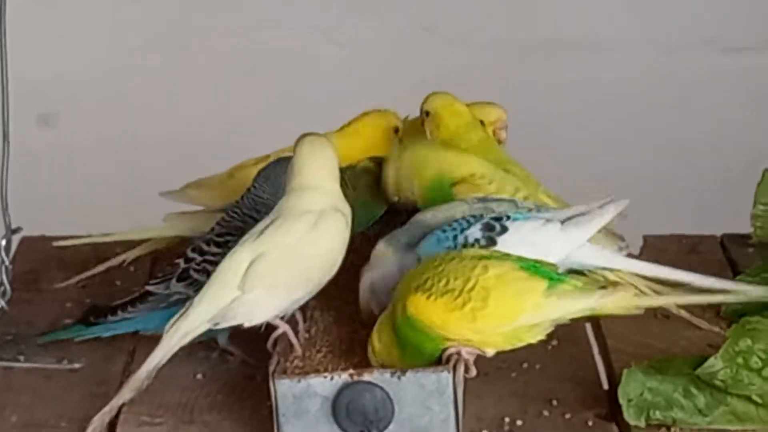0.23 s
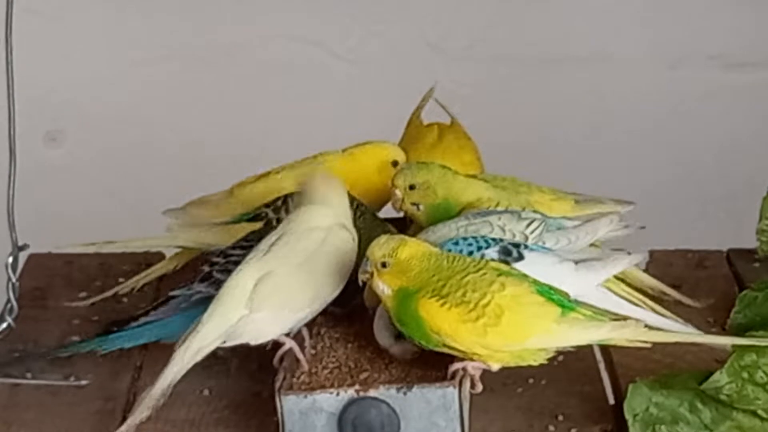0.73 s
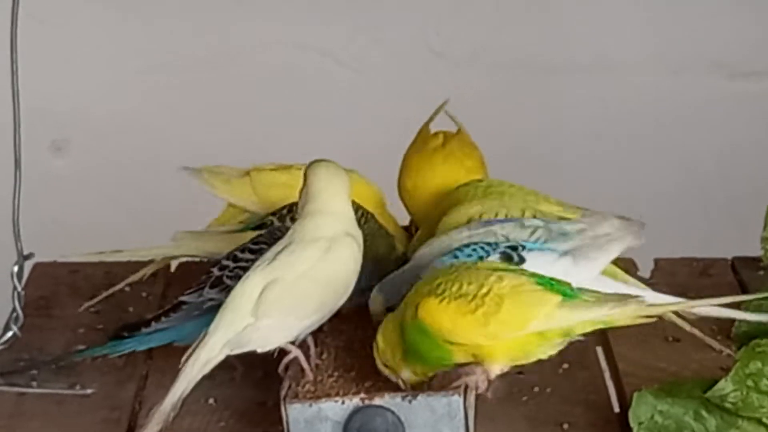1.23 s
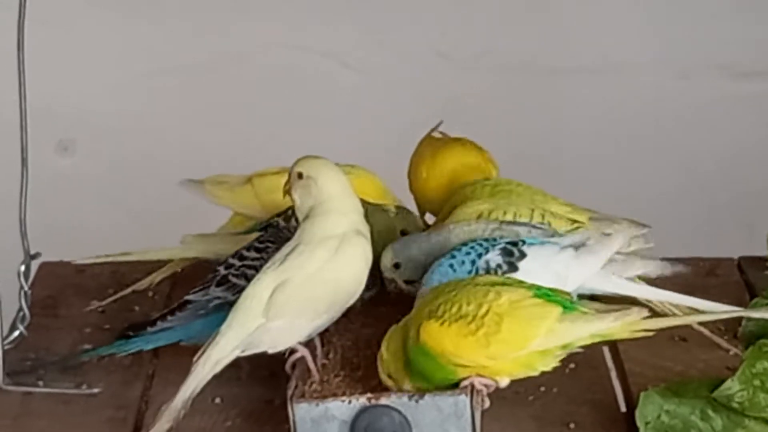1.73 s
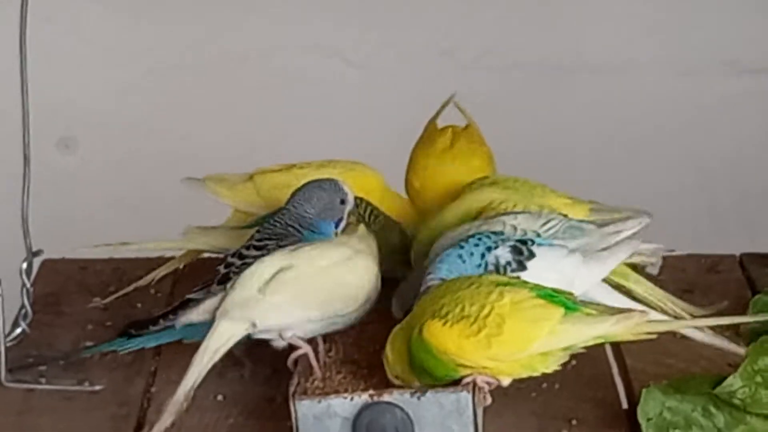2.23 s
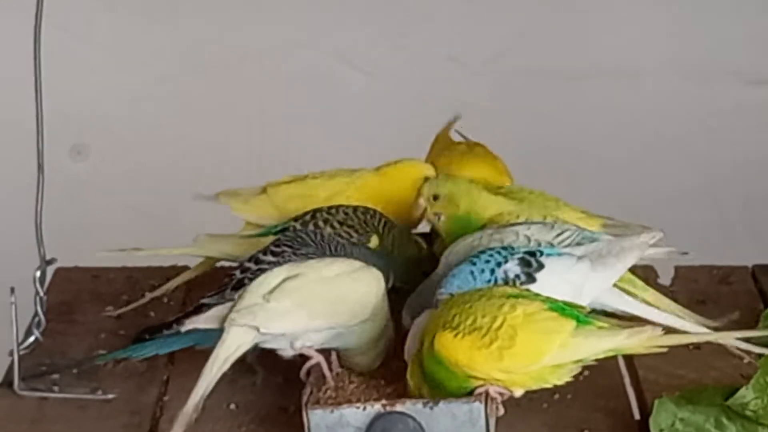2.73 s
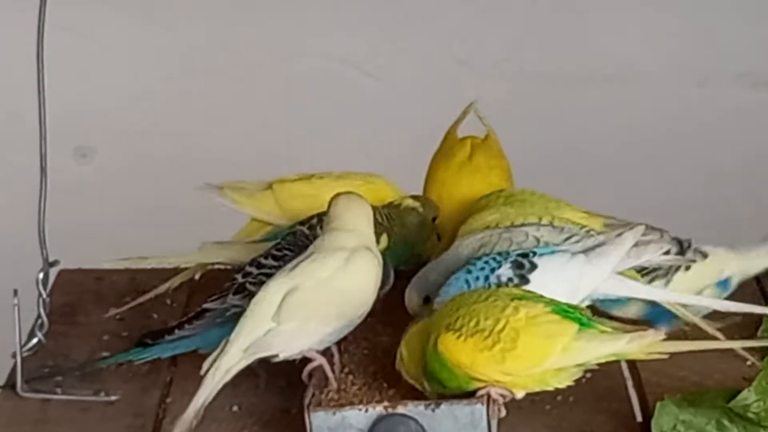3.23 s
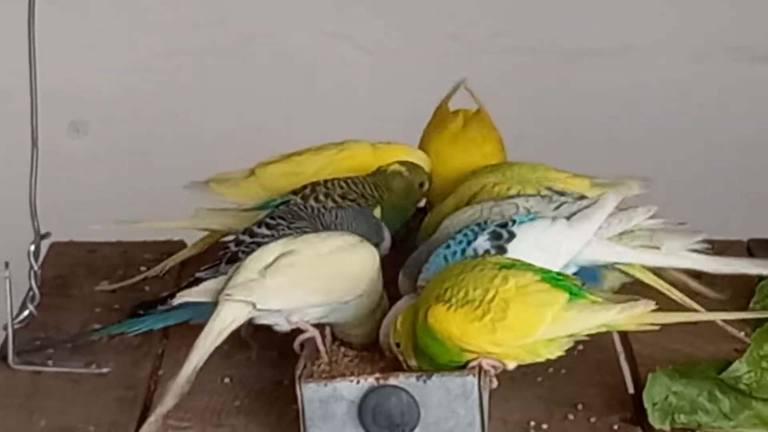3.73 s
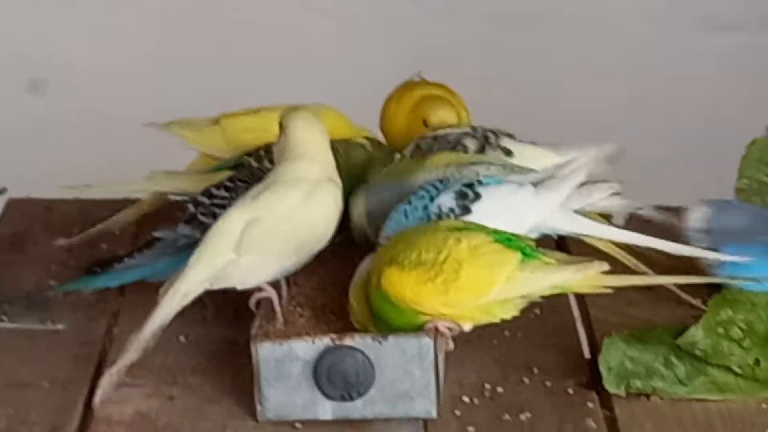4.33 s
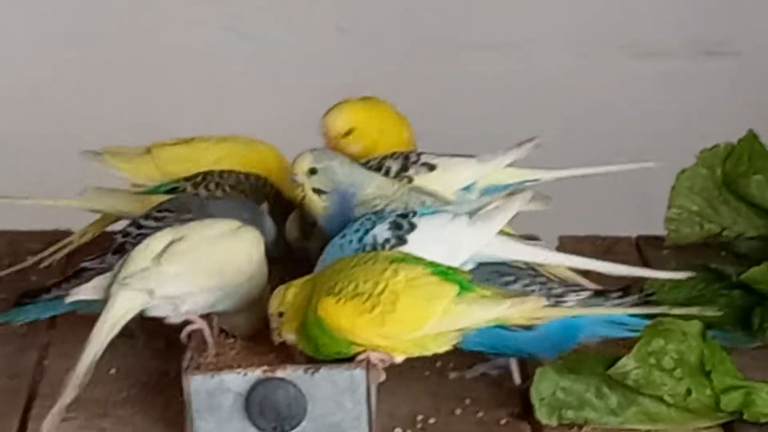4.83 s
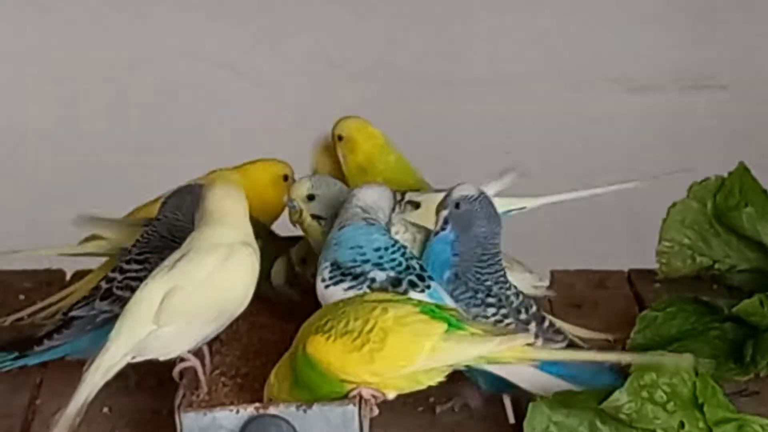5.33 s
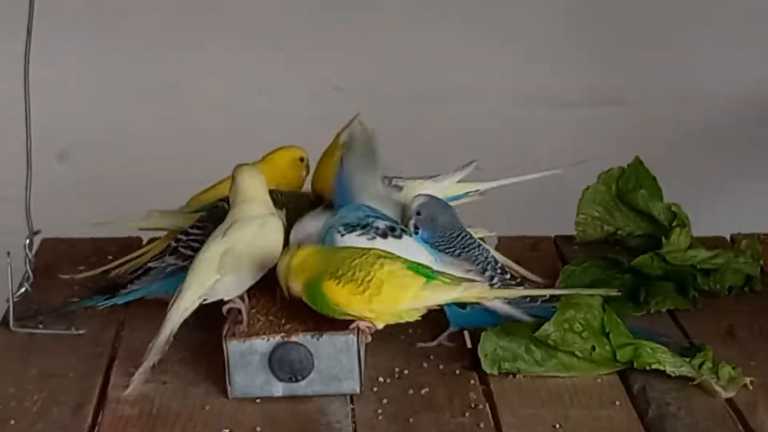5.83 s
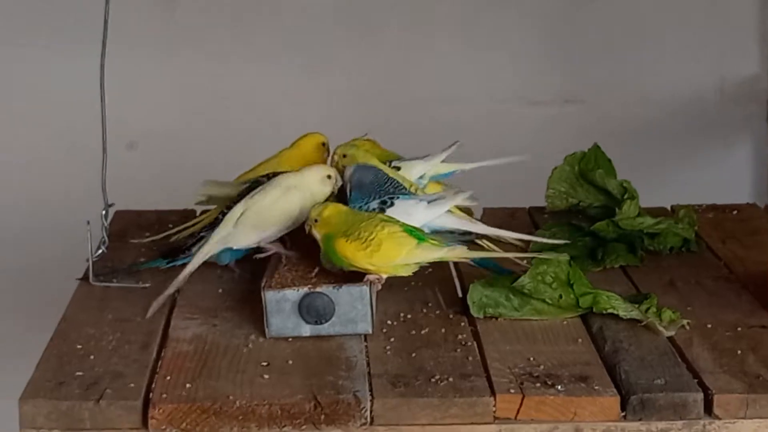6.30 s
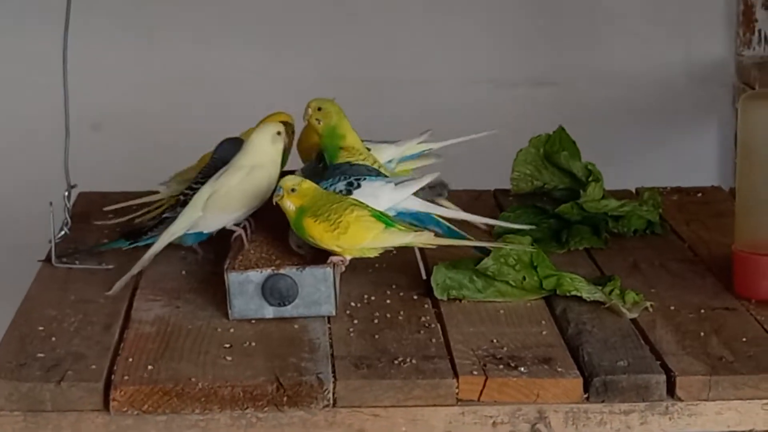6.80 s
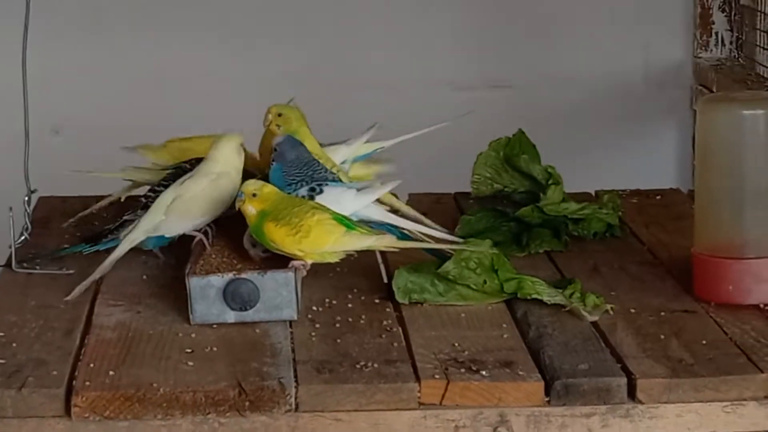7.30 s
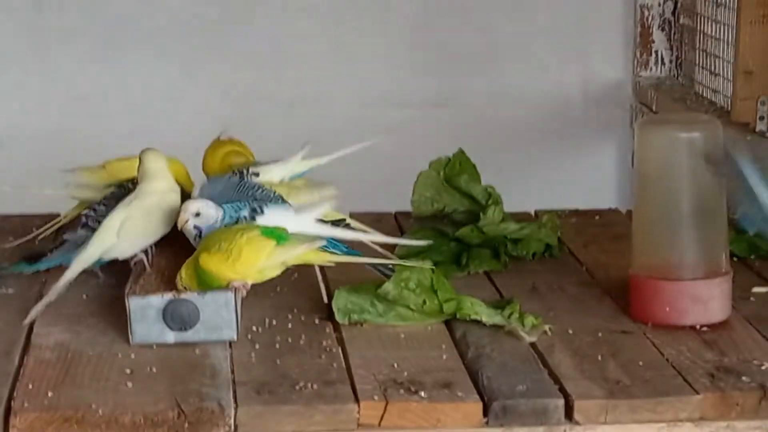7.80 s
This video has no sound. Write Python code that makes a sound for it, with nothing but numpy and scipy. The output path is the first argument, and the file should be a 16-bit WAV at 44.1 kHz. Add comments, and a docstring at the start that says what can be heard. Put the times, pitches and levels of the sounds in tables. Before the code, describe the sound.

Budgies squabble at a seed tray in a small hard shelter, with raspy flicked chirps, quick upward notes, brief squeals and rustling feathers.

```python
"""Budgies at a seed tray

Budgies squabble in a small hard-walled shelter: raspy flicked chirps, fast upward sweeps and three squeals, built
from overtones and noise and heard mostly off the walls. Cracked seed snaps; feathers and husks rustle in shaped
noise, and an airy hiss stands out late on. Far off, low thuds and traffic are soft noise, an engine two sines."""
import sys
import numpy as np
from scipy import signal
from scipy.fft import rfft, irfft, next_fast_len
from scipy.io import wavfile
from scipy.ndimage import uniform_filter1d, map_coordinates

SR = 44100
rng = np.random.default_rng(int(sys.argv[2]) if len(sys.argv) > 2 else 0)


def waveform_to_disk(signal):
    """Save audio, clipped to [-1, 1], as 16-bit WAV at the path in sys.argv[1]."""
    frames = np.transpose(np.atleast_2d(signal))
    scaled = np.clip(frames, -1, 1) * 32767
    samples = np.round(scaled).astype(np.int16)
    wavfile.write(sys.argv[1], SR, samples)


N = 355269  # length in samples

# Fast chattered notes that sweep up: start_s, relative level_db, top_pitch_hz, climb_s, step_per_overtone_db
CHATTER_NOTES = [(0.474, -50.5, 2600, 0.0063, -12), (0.530, -42.5, 3160, 0.0042, -24),
                 (0.589, -42, 3426, 0.0063, -30), (0.649, -43, 3410, 0.0064, -24),
                 (0.707, -41, 3730, 0.006, -27), (0.771, -42, 3410, 0.0081, -19)]


def chirps():
    """A burst of the syrinx, a flicked tone plus rasp, shaped by the open beak."""
    # Short chirps: start_s, level_db before a 6.5 dB lift, pitch_hz passed during the flick,
    # beak_resonance_hz, rasp_db against the tone
    chirp_rows = [(0.849, -32, 2663, 4050, -4), (0.919, -39, 2326, 2300, -3.5),
                  (0.979, -32.5, 1107, 3600, -10), (1.077, -38, 2280, 2540, -5.5),
                  (1.215, -44.5, 2710, 2910, -3), (1.3818, -41, 1102, 2800, 0.5),
                  (1.463, -35.5, 952, 3370, -3), (1.523, -39, 3345, 2620, -4.5),
                  (3.2066, -36, 1876, 2710, -2.5), (3.385, -36.5, 2620, 3060, 11),
                  (4.126, -44, 2800, 2180, -12.5), (4.3115, -44, 1160, 1680, 2),
                  (4.726, -50.5, 1930, 1850, -3), (4.781, -53, 1744, 3200, -6.5),
                  (5.139, -31.5, 1029, 3560, -5), (5.1889, -34, 957, 3000, 9),
                  (5.2531, -31, 1093, 2880, -10.5), (5.3224, -36.5, 2376, 2880, -6),
                  (5.515, -49, 2520, 2740, -0.5), (5.8173, -31.5, 1201, 4200, 4.5),
                  (5.87, -39.5, 1108, 3420, -3), (5.9302, -37.5, 1780, 4150, -1),
                  (5.9934, -35.5, 2766, 4350, -6.5), (6.31, -36.5, 1043, 3350, -3.5),
                  (6.478, -43, 2550, 4530, -3.5)]
    out, t = np.zeros((2, N + SR)), np.arange(SR // 20) / SR
    burst = (t / 0.0036) * np.exp(1 - t / 0.0032)
    for s, db, pitch_hz, beak_hz, rasp_db in chirp_rows:
        # a higher beak resonance is brighter: 19.5 dB more treble per octave above 3 kHz
        treble_db = -17.5 + 19.5 * np.log2(beak_hz / 3000)
        shoulder_hz = max(beak_hz / np.sqrt(2), 1300)
        beak_curve = [(500, -60), (850, -22), (1250, -13), (shoulder_hz, -5), (beak_hz, 0),
                      (7200, treble_db), (10500, treble_db - 6), (16000, treble_db - 18.0)]
        beak = lambda hz: amp(along(beak_curve, hz))
        swing = 0.045 + 0.5 * np.tanh(amp(2 * rasp_db))  # a raspier voice starts further below its pitch
        flick = 1 + swing * (.3 + .15 * wobble(250, size=len(t)) - np.exp(-t / .004))
        cycle = 2 * np.pi * np.cumsum(pitch_hz * flick) / SR
        tone = sum(beak(k * pitch_hz) * amp(-1.5 * k) * np.sin(k * cycle + k)
                   for k in range(1, int(9000 / pitch_hz)))
        rasp = filtered(rng.standard_normal(len(t)), beak)
        voice = unit(unit(tone) + amp(rasp_db) * unit(rasp))
        add(out, amp(db + 6.5) * burst * voice, s - .005, direct_db=-9.5)
    return out[:, :N]


def risers():
    """A note that climbs in a few milliseconds, with overtones; a rasp sets in at once."""
    # Single upward sweeps: start_s, relative level_db, top_pitch_hz, climb_s, step_per_overtone_db
    single_notes = [(2.855, -36.5, 2800, 0.0064, -6), (2.922, -43, 2746, 0.0073, -12),
                    (2.983, -40.5, 2735, 0.0058, -7), (3.047, -43.5, 2790, 0.0047, -20),
                    (3.121, -39.5, 2800, 0.0052, -19), (3.295, -31.5, 2850, 0.0073, -3),
                    (3.533, -37.5, 1895, 0.0034, -27), (3.896, -37.5, 2030, 0.0032, -15),
                    (3.590, -36.5, 2326, 0.0047, -32), (3.689, -37.5, 2405, 0.0042, -42),
                    (4.054, -43, 2780, 0.0031, -25), (4.191, -44, 2605, 0.0057, -3.5),
                    (4.615, -46, 2350, 0.0042, -44), (5.580, -43, 2850, 0.0059, -5),
                    (5.650, -38, 2365, 0.011, -4), (5.760, -39, 2830, .006, -3),
                    (6.112, -38, 2790, 0.0044, -32), (6.176, -36, 2890, 0.0065, -29),
                    (6.231, -37, 2580, 0.0064, -8.5)]
    start_hz, dwell_climbs, quaver = 1150, 2.3, .04  # sweep start, note length in climbs, unsteady pitch
    out, t = np.zeros((2, N + SR)), np.arange(SR // 20) / SR
    for rows, rasp_db in [(CHATTER_NOTES, -1), (single_notes, -14)]:
        for s, db, top_hz, climb_s, step_db in rows:
            hz = top_hz - (top_hz - start_hz) * np.exp(-(t / climb_s) ** 2)
            cycle = 2 * np.pi * np.cumsum(hz * (1 + quaver * wobble(318, size=len(t)))) / SR
            tone = sum(amp(step_db * k) * np.sin((k + 1) * cycle) for k in range(int(9000 / top_hz)))

            def resonance(f):
                """A broad peak at the top pitch, with the treble rolled off above 8 kHz."""
                peak = f * top_hz / np.abs(top_hz ** 2 - f * f + 1j * f * top_hz)
                return peak / (1 + (f / 8000) ** 4)

            rasp = filtered(rng.standard_normal(len(t)), resonance)
            u = t / (dwell_climbs * climb_s)
            voice = u * unit(tone) + amp(rasp_db) * np.tanh(u * 10) * unit(rasp)
            add(out, amp(db + 7.5) * np.exp(-u ** 4) * voice, s, direct_db=-5.5)
    return out[:, :N]


def pips():
    """The close, dry pip at the start of each chatter note: a short sine near 1400 Hz."""
    out, t = np.zeros((2, N + SR)), np.arange(SR // 100) / SR
    for s, db, *_ in CHATTER_NOTES:
        pip = np.hanning(len(t)) * np.sin(2 * np.pi * 1400 * rng.normal(1, .04) * t)
        add(out, amp(db - 14) * pip, s - .003, direct_db=9)
    return out[:, :N]


def squeals():
    """A held, gliding note whose strength flutters, with breathy noise on each cycle."""
    # One list of glide points per squeal: time_s, pitch_hz, level_db before the flutter
    glides = [
        [(4.855, 1340, -61), (4.875, 1355, -38), (4.935, 1776, -34.5), (4.99, 1860, -31.5),
         (5.015, 1930, -36.5), (5.07, 1598, -32), (5.1, 1454, -46)],
        [(6.42, 1476, -52.5), (6.45, 1470, -44.5), (6.458, 1475, -41.5), (6.503, 1882, -33),
         (6.513, 2322, -32.5), (6.535, 2252, -36.5), (6.56, 1948, -39.5)],
        [(6.59, 1783, -50), (6.615, 1736, -34), (6.662, 1663, -53.5), (6.675, 1690, -69)],
    ]
    # Overtones from the fundamental up, at full effort: relative level_db
    overtones_db = [4, -4, -9, -16, -17, -25]
    # Pitch unsteadiness of each squeal at 1700 Hz: fraction of the pitch
    unsteadiness = [.052, .036, .032]
    out = np.zeros((2, N + SR))
    for rows, unsteady in zip(glides, unsteadiness):
        s, hz, db = np.transpose(rows)
        t = np.arange(s[0], s[-1], 1 / SR)
        pitch_hz, level_db = np.interp(t, s, hz), np.interp(t, s, db)
        shake = unsteady * (pitch_hz / 1700) ** 2  # the higher the note, the rougher
        cycle = 2 * np.pi * np.cumsum(pitch_hz * (1 + shake * wobble(200, size=len(t)))) / SR
        effort_db = level_db - db.max()  # overtones grow with effort
        tone = sum(amp(g + 0.053 * k * effort_db) * np.sin(k * cycle)
                   for k, g in enumerate(overtones_db, 1))
        puffs = rng.standard_normal(len(t)) * (1 + np.cos(cycle))
        breath = filtered(puffs, lambda f: (f > 1000) * 9000 / (f + 9000))
        level = amp(level_db + 5.9 * wobble(85.2, size=len(t)))
        add(out, level * (unit(tone) + amp(-17) * unit(breath)), s[0], direct_db=-9)
    return out[:, :N]


def ticks():
    """Beaks cracking seed: a bright noise snap that falls 60 dB in 25 ms."""
    # Snaps: start_s, level_db before a 10 dB lift
    tick_rows = [(1.829, -48), (1.911, -51), (5.0497, -39), (5.249, -37), (5.82, -44.5), (6.8423, -53.5),
                 (7.1472, -51), (7.482, -58)]
    # Colour of a cracking husk: frequency_hz, relative level_db
    snap_colour = [(2000, -13.5), (5000, -4), (9000, -7.5), (15900, -2.5)]
    out, t = np.zeros((2, N + SR)), np.arange(SR // 50) / SR
    for s, db in tick_rows:
        snap = filtered(rng.standard_normal(len(t)), lambda hz: amp(along(snap_colour, hz)) * (hz > 1500))
        add(out, amp(db + 10.0 - 60 * t / 0.025) * unit(snap), s, direct_db=-9.0)
    return out[:, :N]


def rustle():
    """Feathers brush in soft sweeps; husks patter in dry grains on a hiss."""
    # Birds shift on the tray: start_s, hold_s, feathers_db, husks_db
    stirs = [(0.0, 0.1, -66, -53.5), (0.09, 0.045, -51.5, -70), (0.36, 0.065, -56.5, -54.5),
             (0.7, 0.51, -51, -63.5), (1.3, 0.052, -47.5, -78), (1.5, 0.078, -44.5, -51.5),
             (1.775, 0.13, -50, -68), (2.18, 0.18, -59, -68.5), (2.45, 0.63, -52.5, -60),
             (3.05, 0.39, -49, -60), (4.3, 0.024, -58, -68.5), (5.05, 0.29, -47, -56.5),
             (5.6, 0.24, -53.5, -56.5), (5.8, 0.82, -50, -66.5), (6.15, 0.61, -60, -65),
             (7.45, 0.088, -65.5, -63)]
    # Floor between the stirs: feathers_db, husks_db
    still_db = [-72.5, -69.5]
    # Colour of feathers: frequency_hz, relative level_db
    feather_colour = [(400, -28), (900, -2.5), (1800, 2), (3000, -7), (6000, -16), (12000, -51)]
    # Colour of husks: frequency_hz, relative level_db
    husk_colour = [(2000, -40), (4000, -4), (7500, 1.5), (10000, -0.5), (15900, -17)]
    feathers_db, husks_db = swells(stirs, still_db, rise_db_per_s=315.0, fall_db_per_s=145)
    feathers = rush(feather_colour, patchy_db=3.5, source=rng.standard_normal((2, N)))
    patter = (rng.random(N) < 25 / SR) * amp(-14 * rng.random(N))  # about 25 grains a second
    settle = signal.fftconvolve(patter, amp(-60 * np.arange(SR // 8) / SR / 0.22))[:N]
    grains = rng.standard_normal((2, N)) * (1 + 1.8 * settle)
    husks = rush(husk_colour, patchy_db=4.5, source=grains)
    return amp(feathers_db + 2.08 * wobble(3.8, size=N)) * feathers + amp(husks_db) * husks


def air():
    """A smooth hiss, strongest in the top octave."""
    # Level of the hiss: time_s, level_db
    air_level = [(4.8, -77), (5.05, -61.5), (7.15, -64.5), (7.35, -93.5)]
    # Colour of the hiss: frequency_hz, relative level_db
    air_colour = [(8000, -1.5), (11000, -2.5), (15900, 3.5)]
    level_db, = curves(air_level)
    return amp(level_db) * rush(air_colour, patchy_db=-0.5, source=rng.standard_normal((2, N)))


def traffic():
    """A far murmur of low noise that comes and goes."""
    # Level before a slow random wobble: time_s, level_db
    traffic_level = [(0.0, -68.5), (0.9, -55.5), (1.37, -60.5), (1.9, -51.5), (2.11, -67), (2.62, -52),
                     (4.49, -67.5), (5.27, -59), (5.76, -68), (6.01, -52), (6.8, -55), (7.31, -72.5),
                     (7.81, -55.5), (7.9, -69.5)]
    # Colour of the murmur: frequency_hz, relative level_db
    traffic_colour = [(90, 5), (150, 0), (300, 2), (420, -5), (600, -17.5), (900, -17.5)]
    level_db, = curves(traffic_level)
    murmur = rush(traffic_colour, patchy_db=4.0, source=rng.standard_normal((2, N)), size=4096)
    return amp(level_db + 3.35 * wobble(7.9, size=N)) * murmur


def engine():
    """A far drone of two orders, slightly unsteady around 86.5 Hz and its octave."""
    # Idling level before the wobble: time_s, level_db
    idle_level = [(0, -69), (0.9, -60.5), (1.4, -72), (2.3, -64), (4.3, -99), (4.8, -64), (5.4, -93),
                  (8.06, -91)]
    # The drone swells: start_s, hold_s, level_db before the wobble
    revs = [(2.55, 0.37, -46.5), (3.23, 0.19, -47), (3.55, 0.24, -52), (4.05, 0.11, -54.5)]
    idle_db, = curves(idle_level)
    revs_db, = swells(revs, -100, rise_db_per_s=106, fall_db_per_s=117)
    turn = 2 * np.pi * np.cumsum(86.5 + 1.98 * wobble(5.3, size=N)) / SR
    drone = np.sin(turn) + amp(-13.0) * np.sin(2 * turn)
    return (amp(idle_db) + amp(revs_db)) * amp(2.7 * wobble(7.8, size=N)) * drone


def thuds():
    """Far low thuds: swells of deep noise over a faint floor."""
    # Thuds: start_s, hold_s, level_db
    thud_rows = [(2.45, 0.24, -54.5), (3.35, 0.07, -55.5), (5.2, 0.07, -47), (6.0, 0.37, -59.5),
                 (7.8, 0.024, -71)]
    # Colour of a thud: frequency_hz, relative level_db
    thud_colour = [(25, -45.5), (50, -1), (75, -9.5), (140, -12.5)]
    level_db, = swells(thud_rows, -69, rise_db_per_s=148.0, fall_db_per_s=62)
    return amp(level_db) * rush(thud_colour, patchy_db=2.5, source=rng.standard_normal((2, N)), size=4096)


def add(out, voice, s, direct_db):
    """Place a voice: a direct path, then the walls, each frequency dying at its own speed."""
    # Echo of the shelter: frequency_hz, time_to_fall_60_db_s
    wall_decay = [(500, 0.32), (2000, 0.38), (5000, 0.3), (12000, 0.25)]
    hz, t, z = signal.stft(rng.standard_normal((2, SR // 3)), SR, nperseg=256)
    tail = signal.istft(z * amp(-60 * t / along(wall_decay, hz)[:, None]), SR, nperseg=256)[1]
    tail *= 1 - np.exp(-np.arange(tail.shape[1]) / SR / 0.0037)  # the echoes thicken
    tail /= np.linalg.norm(tail[0])
    tail[[0, 1], rng.integers(0, 12, size=2)] += amp(direct_db)  # reaches each side at its own instant
    heard = signal.fftconvolve(voice[None], tail, axes=1)
    out[:, round(s * SR):][:, :heard.shape[1]] += heard


def rush(spectrum, patchy_db, source, size=512):
    """Stereo noise of rms 1 with patches of random gain; a long frame makes them narrow, like passing hums."""
    # Likeness of the two microphones: frequency_hz, left_right_likeness (0 to 1)
    likeness = [(60, 0.97), (290, 0.87), (640, 0.67), (1400, 0)]
    z = signal.stft(source, nperseg=size)[2]
    field = uniform_filter1d(rng.standard_normal(z.shape[1:]), 4096 // size, 0)
    field = uniform_filter1d(field, 2 + 4096 // size, 1)
    pair = signal.istft(z * amp(patchy_db * unit(field)), nperseg=size)[1][:, :N]
    turn = lambda hz: np.arccos(np.clip(along(likeness, hz), 0, 1)) / 2
    # silence an octave beyond either end of the spectrum
    closed = [(spectrum[0][0] / 2, -120)] + list(spectrum) + [(spectrum[-1][0] * 2, -120)]
    mid, side = filtered(pair, lambda hz: amp(along(closed, hz)) * [np.cos(turn(hz)), np.sin(turn(hz))])
    return unit(np.array([mid + side, mid - side]))


def swells(rows, floor_db, rise_db_per_s, fall_db_per_s):
    """Levels in dB: each (s, hold s, dB, ..) row rises, holds and dies away over a floor."""
    t = np.arange(N) / SR
    power = amp(2 * np.reshape(floor_db, (-1, 1))) * np.ones(N)
    for s, hold, *db in rows:
        lost = rise_db_per_s * np.maximum(s - t, 0) + fall_db_per_s * np.maximum(t - s - hold, 0)
        power = power + np.outer(amp(2 * np.array(db)), amp(-2 * lost))
    return 10 * np.log10(power)


def curves(rows):
    """One value per sample for each column after the time."""
    s, *cols = np.transpose(rows)
    return [np.interp(np.arange(N) / SR, s, c) for c in cols]


def wobble(rate, size):
    """A smooth random curve, rate knots a second."""
    knots = rng.standard_normal(size // 128 + 4)
    return map_coordinates(knots, [np.arange(size) * rate / SR])


def filtered(x, response):
    """x times a response of frequency."""
    m = next_fast_len(x.shape[-1] + 8192)
    return irfft(rfft(x, m) * response(np.fft.rfftfreq(m, 1 / SR)), m)[..., :x.shape[-1]]


def along(points, hz):
    """Read (Hz, value) points on a log frequency axis."""
    f, v = np.transpose(points)
    return np.interp(np.log(hz + 1), np.log(f + 1), v)


def amp(db):
    """Decibels to amplitude."""
    return 10 ** (np.asarray(db) / 20)


def unit(x):
    """Scale to an rms of 1."""
    return x / np.sqrt(np.mean(x ** 2) + 1e-20)


def scene():
    """The birds on the tray, then the air and the distance behind them."""
    birds = chirps() + risers() + pips() + squeals() + ticks() + rustle()
    return birds + air() + traffic() + engine() + thuds()


def record(dry):
    """The two microphones differ in colour; nothing is kept above 15850 Hz."""
    # Colour difference of the microphones: frequency_hz, left_minus_right_db
    tilt = [(300, -3.5), (2000, -.5), (4000, -2), (8000, .4), (13000, -6)]
    return filtered(dry, lambda hz: amp(np.outer([.5, -.5], along(tilt, hz))) * (hz < 15850))


dry = scene()
out = record(dry)
waveform_to_disk(out)
```